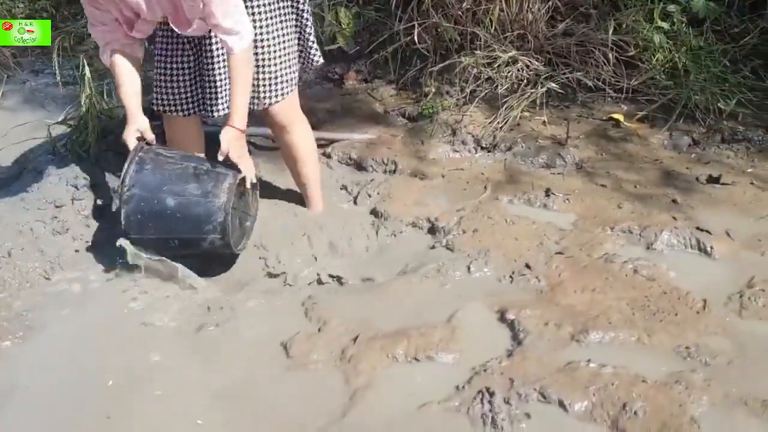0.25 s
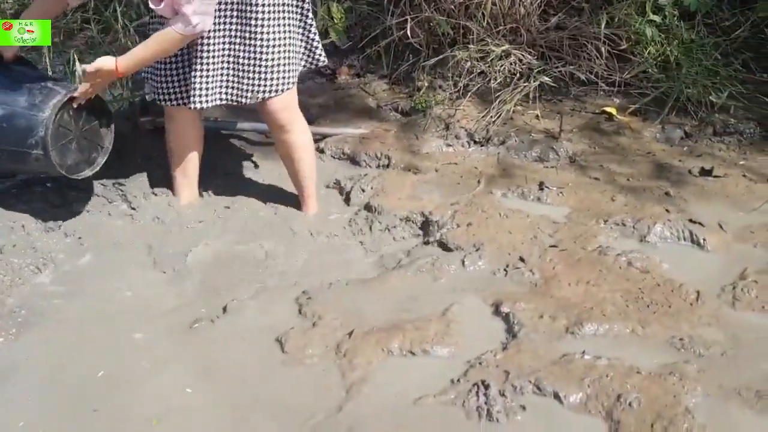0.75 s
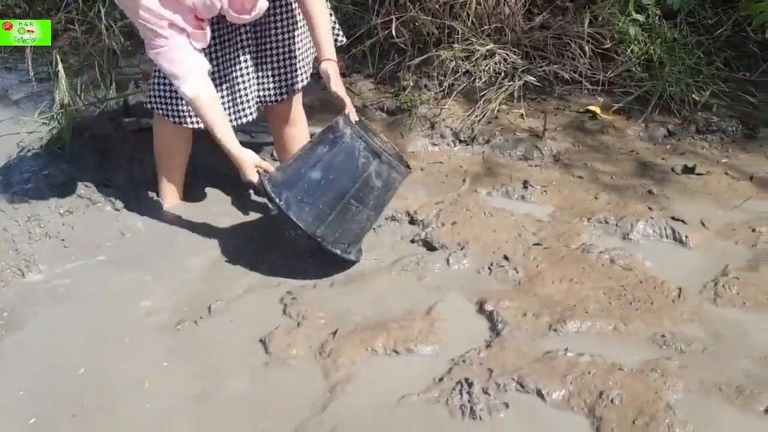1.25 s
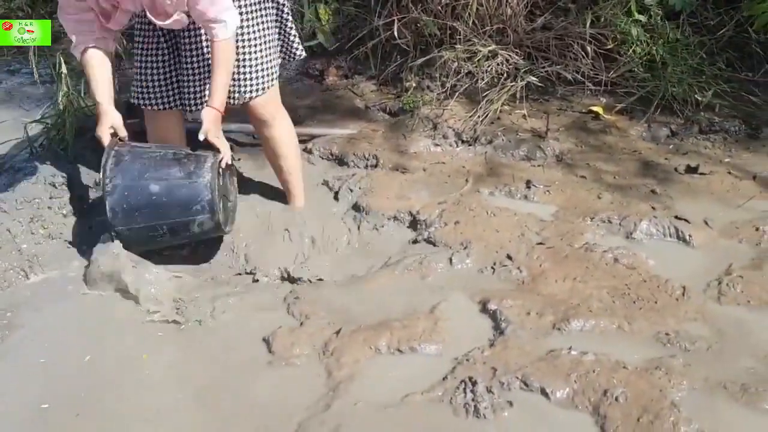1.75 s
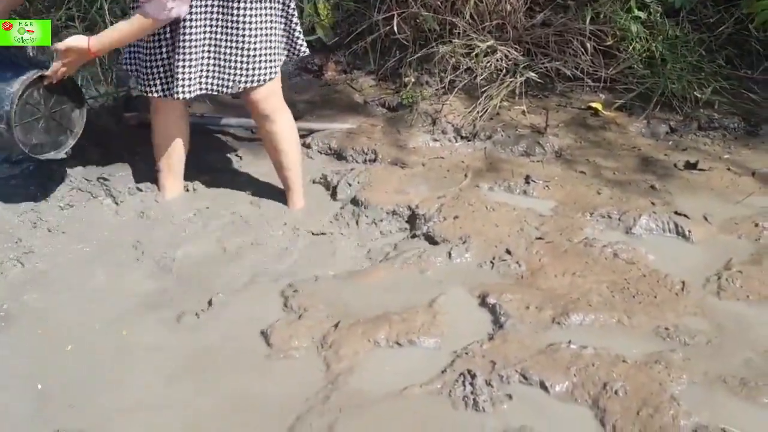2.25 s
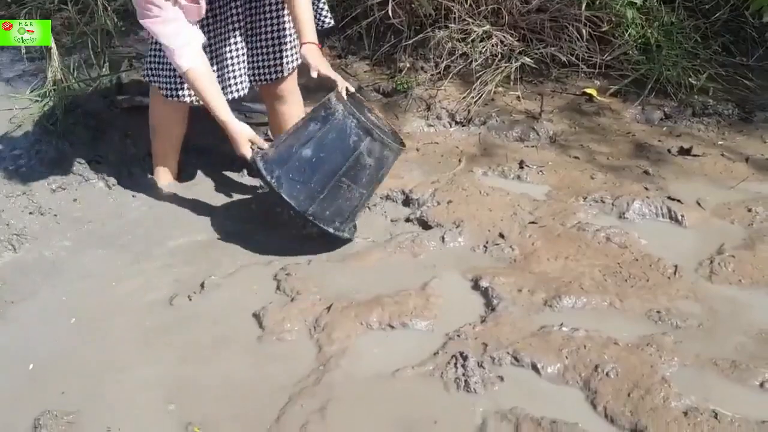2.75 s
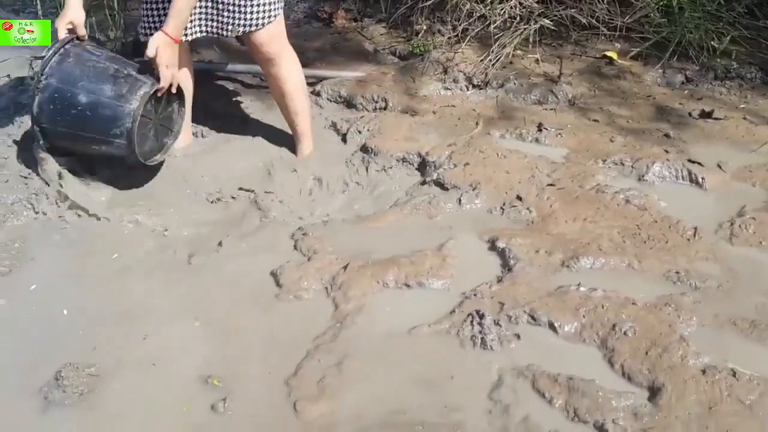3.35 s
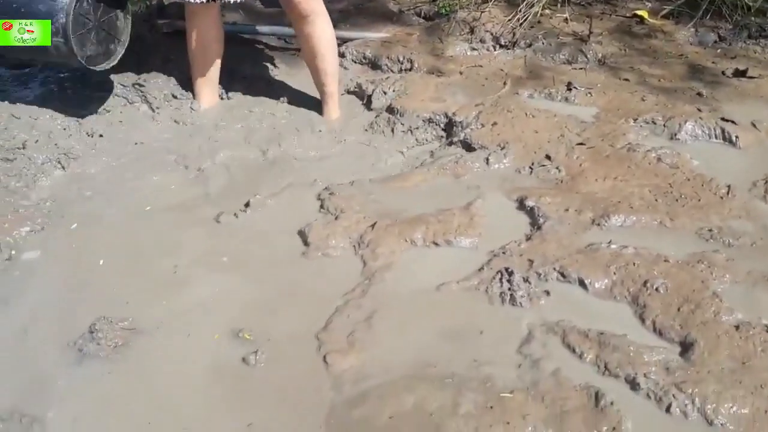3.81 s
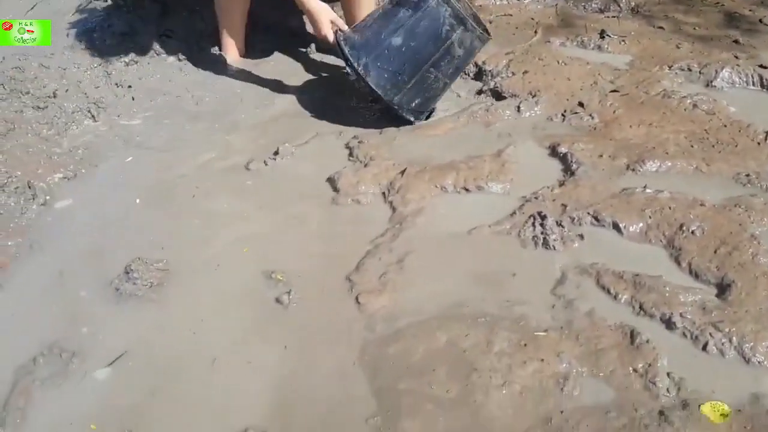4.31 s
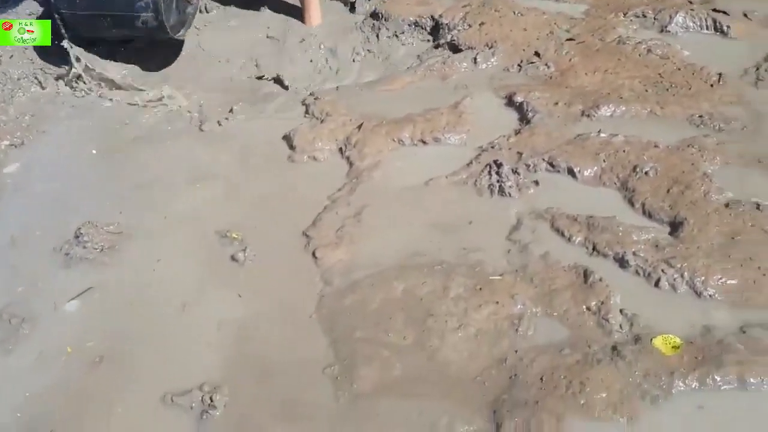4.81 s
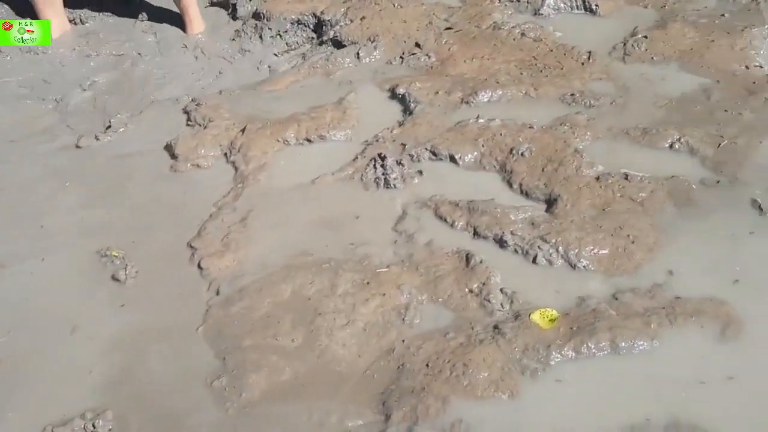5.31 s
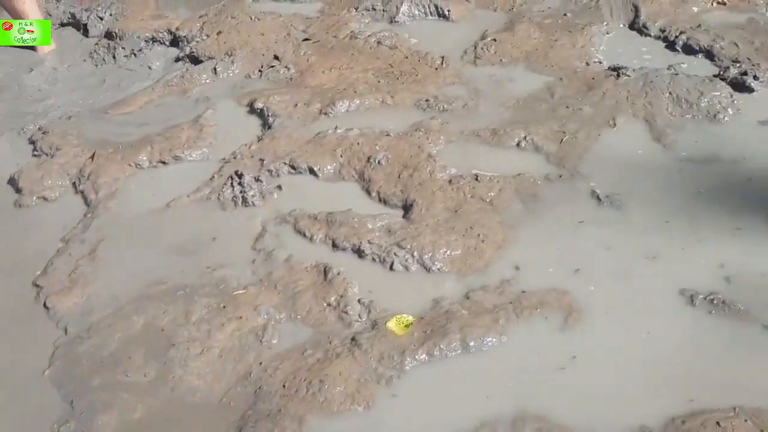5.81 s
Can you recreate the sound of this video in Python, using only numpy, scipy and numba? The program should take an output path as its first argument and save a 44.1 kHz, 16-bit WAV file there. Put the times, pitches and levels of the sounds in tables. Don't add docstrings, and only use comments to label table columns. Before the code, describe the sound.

A plastic bucket scoops thin mud from a shallow pool, four rounds of gulping plop, slosh and hard wet slap, under faint open-air wind.

```python
import sys
import numpy as np
from scipy import signal
from scipy.fft import rfft, irfft
from scipy.io import wavfile
from scipy.ndimage import uniform_filter1d, map_coordinates
from numba import njit

SR = 44100
rng = np.random.default_rng(int(sys.argv[2]) if len(sys.argv) > 2 else 0)


def voltage_ratio(decibels):
    exponent = np.asarray(decibels, float) / 20
    return 10 ** exponent


def store_wav(level_fs):
    pcm = np.round(np.clip(np.atleast_2d(level_fs), -1, 1) * 32767)
    wavfile.write(sys.argv[1], SR, pcm.T.astype(np.int16))


N = 267687

# pitch [Hz], level [dB per octave].
WATER_COLOUR = [(200, -25), (350, -12.5), (600, 0), (850, -5.5), (1300, -4), (1620, -4.5), (1980, -3.5),
                (2500, -6), (3600, 0.5), (4500, -3.5), (5500, -6), (8500, -5.5), (12500, -6), (15800, -10)]


@njit
def grains(start, hz, cycles, glide, size, lead, pan, swell):
    out = np.zeros((2, N))
    for k in range(len(start)):
        tau = cycles[k] / hz[k] * SR / 3
        w = 2 * np.pi * hz[k] / SR
        for c in range(2):
            late = start[k] + c * lead[k]
            i = int(late) + 1
            side = pan[k] if c == 0 else 1 / pan[k]
            z = np.exp((1j * w - 1 / tau) * (i - late)) * size[k] * side
            p = np.exp(1j * w - 1 / tau)
            q = np.exp(1j * w * glide[k] * .7 / (3 * tau))
            rise = np.exp(-swell * (i - late) / tau)
            r = np.exp(-swell / tau)
            for j in range(max(i, 0), min(i + int(5 * tau), N)):
                out[c, j] += z.imag * (1 - rise)
                z, p, rise = z * p, p * q, rise * r
    return out


def lead(s):
    backswings = [
        0.02,
        1.53,
        3,
        4.5,
    ]
    # time into the swing [s], head start of the left port [samples].
    swing_lead = [(.1, 1.9), (.3, 6.56), (.62, 10.6), (.78, 11.3), (.87, 9.8), (1.0, 12), (1.35, 13)]
    turn_s, turn_lead_per_s = 4.84, 4.65
    back = np.array(backswings)
    into = s - back[np.maximum(np.searchsorted(back, s) - 1, 0)]
    return np.interp(into, *np.transpose(swing_lead)) + turn_lead_per_s * np.maximum(s - turn_s, 0)


def ring_pockets(start_s, hz, peak_db, cycles, glide, swell, scatter=0, side=1):
    zero = np.zeros(len(start_s))
    return grains(start_s * SR + zero, hz + zero, cycles + zero, glide + zero, voltage_ratio(peak_db + zero),
                  lead(start_s) + scatter + zero, side + zero, float(swell))


def walk(rate):
    k = int(SR / rate)
    held = np.repeat(rng.standard_normal(N // k + 1), k)
    return 1.04 * uniform_filter1d(held, k)[:N]


def colour(table, hz):
    table_hz, value = np.transpose(table)
    return np.interp(np.log(hz + 1), np.log(table_hz), value)


def noise(table):
    shape = voltage_ratio(colour(table, np.fft.rfftfreq(N, 1 / SR)))
    return irfft(rfft(rng.standard_normal((2, N))) * shape, N)


def highpass(sound, hz):
    return signal.sosfilt(signal.butter(2, hz, "high", fs=SR, output="sos"), sound)


def slosh_db(s, hz):
    layer_hz = [
        550,
        1400,
        3700,
        9500,
    ]
    # level at middle flow [dB], its rise with flow [dB per dB], its rise with depth [dB per dB].
    layer_levels = [
        (-46, 1.24, 1.13),
        (-47, 1, 0.34),
        (-46, 1.0031, -0.11),
        (-48, 0.8, 0.11),
    ]
    # time [s], flow [dB], depth or how much air the water folds in [dB].
    swings = [
        [(.12, -55.5, -2.5), (.28, -60, -3.5), (.46, -51.5, -1.5), (.56, -46.5, -0.8), (.76, -46, 6.5),
         (.84, -40, -3), (.93, -46, 2.5), (1.08, -47.5, -3), (1.2, -62, -1)],
        [(1.45, -60, 3.5), (1.77, -61.5, -4.5), (1.88, -46.5, -4), (1.99, -52.5, -6.5), (2.3, -45.5, 5.5),
         (2.37, -37, 3.5), (2.45, -47.5, 7), (2.62, -50, 1.5), (2.72, -60.5, -3)],
        [(2.87, -63, 1), (3.24, -58.5, -3), (3.49, -52, -2.5), (3.57, -46, 0.5), (3.79, -47.5, 3.8),
         (3.88, -36, -1), (3.96, -47.5, 6), (4.07, -48, 1.5), (4.19, -57, -4.5)],
        [(4.45, -65, 7.5), (4.74, -62, -0.5), (4.98, -56, -1), (5.03, -51, 3), (5.27, -43.5, 2),
         (5.38, -35, -7), (5.44, -44.5, -0.5), (5.57, -48, -1.1), (5.62, -59, -4)],
    ]
    still_db, mid_flow_db = -73.5, -46
    t, flow, depth = np.vstack([*swings, [(N / SR, still_db, 0)]]).T
    flow = np.interp(s, t, flow) - mid_flow_db
    depth = np.interp(s, t, depth)
    layers = np.array([db + a * flow + b * depth for db, a, b in layer_levels])
    place = np.interp(np.log(hz), np.log(layer_hz), np.arange(len(layer_hz)))
    return map_coordinates(layers, [place, np.arange(len(s))], order=1) + colour(WATER_COLOUR, hz)


def cloud(count, size, tail_ms, octaves, lo_hz, hi_hz, db, cycles, glide, scatter_db, lump_db, lump_rate, spread):
    even, normal = rng.random((count, 2)).T, rng.standard_normal((count, 5)).T
    moment, pitch, bulk = np.repeat(rng.random((count // size, 3)), size, axis=0).T
    start = np.minimum(moment * N - tail_ms / 1000 * SR * np.log(even[0]), N - 1)
    hz = np.clip(lo_hz * (hi_hz / lo_hz) ** pitch * 2 ** (octaves * normal[4]), 150, 15800)
    turns = cycles * (hz / 1000) ** 0.78 * np.exp(0.585 * normal[0])
    bigger = np.minimum(-np.log(even[1] * bulk), 2.6)
    lumps = lump_db * walk(lump_rate)[start.astype(int)]
    size_db = slosh_db(start / SR, hz) + scatter_db * bigger + lumps
    peak_db = db + size_db + 10 * np.log10(hz / turns / count * 100)
    scatter = spread * np.clip(hz / 1300, .6, 1) * normal[2]
    return ring_pockets(start / SR, hz, peak_db, turns, glide * (1 + normal[1]), 4.78, scatter, voltage_ratio(normal[3]))


def wash():
    gurgle = cloud(count=5100, size=3, tail_ms=10, octaves=0.1994, lo_hz=249.7, hi_hz=2398, db=7.5,
                   cycles=14.5, glide=0.207, scatter_db=1.3, lump_db=0.9, lump_rate=25, spread=2.34)
    spray = cloud(count=18000, size=12, tail_ms=6, octaves=0.246, lo_hz=1200, hi_hz=8040, db=5,
                  cycles=6.1, glide=0.062, scatter_db=2.5, lump_db=1.5, lump_rate=42, spread=2.74)
    mist = cloud(count=80000, size=5, tail_ms=2.0, octaves=0.5, lo_hz=893, hi_hz=15630, db=10,
                 cycles=4.5, glide=0.043, scatter_db=1.5, lump_db=2.05, lump_rate=13, spread=3.02)
    return highpass(gurgle + spray + mist, 190)


def wind():
    # time of the gust [s], level [dB].
    gusts = [(0, -49.5), (.22, -43.5), (.36, -58.5), (.62, -53), (.98, -66), (1.42, -69.5), (1.6, -54.5),
             (2.36, -58), (2.65, -54), (2.78, -63.5), (3.0, -56.5), (4.09, -58), (4.46, -73), (4.58, -57.5),
             (4.95, -47), (5.34, -57), (5.42, -63.5), (6.07, -74)]
    # pitch [Hz], level [dB per Hz].
    rumble_colour = [(20, -13.5), (50, 1.5), (100, -0.5), (150, -8.5), (210, -18), (500, -37)]
    air = noise(rumble_colour) * voltage_ratio(4.8 * np.array([walk(22), walk(28)]))
    gust_db = np.interp(np.arange(N) / SR, *np.transpose(gusts))
    return air / np.std(air) * voltage_ratio(gust_db + 2.0)


def field():
    # pitch [Hz], level [dB per Hz].
    rustle_colour = [(300, -10), (600, -2), (4000, -7), (16000, -4)]
    air = noise(rustle_colour)
    return air / np.std(air) * voltage_ratio(-63)


def streams(count=160):
    # start [s], length [s], level [dB], pitch [Hz].
    trickles = [(.53, .08, -37, 4000), (0.99, 0.2, -49, 1870), (1.78, .17, -37.5, 4560),
                (2.55, 0.23, -49, 1880), (2.7, .2, -48, 1100), (3.3, 0.11, -38.5, 4470),
                (4.64, 0.12, -44, 3340), (4.78, 0.18, -41, 4360), (5.0, .3, -38.5, 2100),
                (4.54, .07, -41.5, 840), (4.48, .14, -42, 280), (4.69, .06, -50, 1240),
                (1.82, .13, -44, 480), (3.25, .17, -50, 378), (.41, .1, -43, 570), (.42, .08, -43, 1270),
                (1.44, 0.071, -46.5, 900), (2.87, .06, -42, 1280), (3.05, .07, -41, 900),
                (5.62, 0.22, -56, 1850), (4.92, .08, -48, 3000), (.26, .12, -50, 910), (1.1, .08, -44, 910),
                (3.28, .18, -45, 2350), (4.82, .15, -41, 2300), (1.8, .16, -46, 2400),
                (2.98, .06, -45, 800), (3.9, .04, -33, 6200), (4.83, .1, -41, 1350), (.0, .14, -50, 200),
                (2.45, .15, -50, 6000), (4.1, .12, -50, 1250), (.1, .12, -50, 1200)]
    octaves, scatter_db = 0.19, 3.0
    s, length, db, hz = np.transpose(trickles)[:, :, None]
    even, normal = rng.random((len(s), 3 * count)), rng.standard_normal((len(s), count))
    first, second, chance = np.split(even, 3, axis=1)
    start = s + length * (first + second) / 2
    size_db = db - scatter_db * np.log(chance + 0.022) + 10 * np.log10(length * hz / 300) - 6
    hz = hz * 2 ** (octaves * normal)
    scatter = 4 * (first - second)
    return ring_pockets(start.ravel(), hz.ravel(), size_db.ravel(), 8.4, 0.19, 4.5, scatter.ravel())


def spatter(start_s, hz, db, cycles):
    place = rng.standard_normal(len(hz))
    size = np.minimum(rng.exponential(size=len(hz)), 4.5) - 1.15
    peak_db = db + colour(WATER_COLOUR, hz) + 4.2 * np.log2(hz / 3000) + 2 * size
    return ring_pockets(start_s, hz, peak_db, cycles, 0, 7.0, np.clip(4000 / hz, 1, 3) * place)


def ticks(count=40):
    # time [s], peak [dB], pitch [Hz].
    drops = [(0.0517, -35, 4270), (0.1192, -35, 2860), (0.1506, -34, 3060), (0.3208, -35, 4300),
             (0.546, -25.5, 3870), (0.734, -24.5, 4380), (0.803, -21, 3740), (1.29, -36, 6930),
             (1.391, -35, 2600), (1.502, -41, 2280), (1.548, -36, 2570), (2.0068, -31.5, 3770),
             (2.352, -17.5, 3400), (2.823, -35, 8300), (3.0157, -36.5, 3120), (3.03, -33.5, 4070),
             (3.2554, -31, 5550), (3.7414, -26, 3380), (3.8247, -25, 3140), (3.8445, -15.5, 4430),
             (3.8635, -15.5, 3800), (3.8847, -17.5, 3450), (4.1133, -29, 3900), (4.27, -39.5, 3450),
             (4.47, -39, 5600), (4.559, -31.5, 5120), (4.6046, -31, 3130), (5.3317, -15.5, 2730),
             (5.6966, -38, 3460)]
    spray_ms = 2.2
    s, db, hz = np.transpose(drops)
    ring = ring_pockets(s, hz, db - 2.5, 30.0, 0.15, 9.0)
    even = rng.random((len(s), 2 * count))
    start = (s[:, None] - np.log(even[:, :count]) * spray_ms / 1000).ravel()
    spray_hz = 500 * 31 ** even[:, count:].ravel()
    away = np.abs(np.log2(spray_hz / np.repeat(hz, count)))
    return ring + spatter(start, spray_hz, np.repeat(db, count) + 1 - 6.7 * away, 5.8)


def gulps():
    # time [s], peak [dB], pitch [Hz], ringing [cycles], glide [octaves]. The rows at 110 to 150 Hz
    slow_swells = [(.060, -15.5, 610, 5.3, -0.15), (0.071, -14, 325, 6.2, -0.0042),
                   (.093, -24, 280, 4.9, 0.0074), (1.539, -20.5, 980, 13, 0.18),
                   (1.59, -30.5, 302, 6.9, -0.19), (1.635, -43, 260, 14.5, 0.54),
                   (1.675, -43, 560, 24, 0.86), (1.715, -38, 1200, 52, -0.015), (3.019, -20, 970, 18, 0.18),
                   (3.041, -15, 394, 6, -0.46), (3.08, -33, 260, 13, 0.28), (3.165, -31, 630, 11.5, 0.2),
                   (3.297, -28, 520, 20, 0.77), (4.434, -31, 500, 16.7, 0.81),
                   (4.528, -34, 353, 9.7, -0.38), (4.59, -26.5, 256, 6.3, -0.03),
                   (4.623, -37, 463, 14, 0.86), (4.715, -32, 1400, 19, -0.007), (5.95, -48, 568, 38, 0.34),
                   (4.81, -33, 1100, 14, .1), (4.495, -39, 330, 6, -.2), (2.53, -33, 403, 8, 0),
                   (2.80, -42, 600, 7, .2), (2.92, -37, 620, 8, .1), (1.0, -26, 750, 13, .2),
                   (0.63, -28, 510, 7.2, 0), (1.6, -37, 1180, 14, .2), (.47, -36, 1000, 12, .1),
                   (4.86, -38, 510, 5.3, 0), (4.74, -32, 125, 3, 0), (4.935, -26, 135, 2.5, 0),
                   (5.035, -28, 125, 3, 0), (2.635, -33, 110, 3.5, 0), (.19, -33, 150, 2.5, 0),
                   (.6, -32, 130, 2.5, 0), (4.82, -33, 120, 3, 0), (1.83, -36, 110, 4, 0),
                   (.385, -37, 130, 3, 0)]
    s, db, hz, cycles, glide = np.transpose(slow_swells)
    return ring_pockets(s, hz, db + 3.5, cycles, glide, 0.41)


def plops(count=8):
    # time [s], peak [dB], pitch [Hz], ringing [cycles].
    large = [(0.062, -22, 301, 2.7), (0.403, -29.5, 549, 9), (0.961, -30, 418, 7), (0.661, -26.5, 605, 7.3),
             (0.752, -16.5, 640, 11), (0.78, -20.5, 546, 15), (1.196, -39.5, 618, 27),
             (1.398, -38, 580, 4.6), (1.544, -25.5, 344, 7.6), (1.904, -29, 686, 7.5),
             (2.279, -22.5, 567, 12), (2.343, -16.5, 674, 10), (2.149, -35, 490, 9.4),
             (2.954, -32.5, 435, 3), (3.026, -25, 326, 3.4), (3.164, -34, 690, 12), (3.652, -24, 465, 10),
             (3.903, -13.5, 556, 4.9), (4.387, -38.5, 487, 6.4), (4.432, -31.5, 528, 10.5),
             (4.49, -31, 705, 9), (4.524, -25.5, 345, 6.7), (4.622, -31, 512, 10), (4.843, -31.5, 780, 15),
             (4.896, -28, 710, 10), (5.0, -30, 804, 6.3), (5.167, -22.5, 631, 18), (5.225, -18, 754, 11.7),
             (5.261, -20.5, 734, 8.9), (5.465, -30.5, 363.4, 12)]
    s, db, hz, cycles = np.transpose(large)
    ring = ring_pockets(s, hz, db, np.clip(cycles, 1, 40), 0.16, 3.6)
    even = rng.random((len(s), 2 * count))
    start = (s[:, None] + 0.02 * even[:, :count] ** 2).ravel()
    ratio = 0.848 * 5.27 ** even[:, count:].ravel()
    shed_db = np.repeat(db, count) - 10.5 - 1.6 * np.log2(ratio)
    return ring + ring_pockets(start, ratio * np.repeat(hz, count), shed_db, 9.1, 0.083, 19.0)


def drips():
    # time [s], peak [dB], pitch [Hz], ringing [cycles].
    small = [(0.196, -36.5, 930, 12), (0.621, -30, 1200, 10), (0.701, -22, 1160, 15), (0.752, -25, 1890, 9),
             (0.823, -30, 969, 12), (0.857, -24, 1025, 18), (1.503, -31.5, 2110, 12), (1.584, -37, 956, 19),
             (1.709, -40.5, 1190, 14), (1.868, -36, 1360, 21), (1.897, -32, 1340, 20),
             (1.921, -27.5, 1160, 12), (2.352, -23, 1200, 9.2), (2.383, -15.5, 1310, 20),
             (2.9, -30, 1010, 5.4), (3.163, -36, 1310, 22), (3.342, -34.5, 1330, 14),
             (3.369, -36, 1390, 12), (3.405, -33, 1060, 14), (3.422, -26, 1040, 10), (3.836, -26, 1150, 15),
             (3.848, -19, 1200, 18), (3.884, -23, 960, 18), (3.905, -9, 1350, 10), (4.497, -34, 1000, 8.5),
             (4.676, -30.5, 1060, 10.5), (4.899, -20, 1120, 5), (5.337, -16, 1930, 13),
             (5.366, -20, 2170, 12), (.272, -38.5, 940, 12), (.545, -30, 686, 9), (.579, -33, 571, 9),
             (.924, -31, 608, 9.1), (1.855, -34.5, 453, 6.8), (1.993, -37.5, 705, 11),
             (2.223, -30, 630, 11.4), (2.318, -21.5, 524, 10), (2.408, -22, 646, 11), (3.364, -34, 807, 9),
             (3.519, -34, 585, 14), (3.883, -20, 567.4, 7), (4.058, -32, 683, 10), (5.03, -31.5, 708, 10),
             (5.084, -29.5, 603, 10), (5.127, -31, 657, 10), (5.298, -25, 654.5, 12),
             (4.605, -37.5, 1700, 14), (1.549, -33, 620, 6)]
    s, db, hz, cycles = np.transpose(small)
    return ring_pockets(s, hz, db + 1.5, np.clip(cycles, 1, 60), 0.14, 15.0)


def blips():
    # time [s], peak [dB], pitch [Hz].
    bubbles = [(.693, -25, 520), (.846, -23, 746), (2.253, -27, 622), (2.383, -25, 420), (3.387, -33, 700),
               (3.544, -32, 614), (3.997, -30, 700), (5.385, -31, 410), (5.507, -34, 430),
               (1.0184, -30, 1200), (2.0318, -35, 1300), (2.149, -30, 1250), (2.5244, -30, 1330),
               (3.1854, -40, 1400), (3.2345, -39, 1250), (3.6994, -28, 1650), (5.6451, -41, 1660),
               (.1664, -38, 2400), (.5374, -32, 2100), (3.8432, -23, 2500), (4.0754, -34, 2200)]
    s, db, hz = np.transpose(bubbles)
    return ring_pockets(s, hz, db + 3, 11.0, 0.15, 8.0)


def smacks(count=24):
    # time [s], peak [dB], pitch [Hz].
    fat_drops = [(0.1895, -33, 4200), (0.3656, -38, 2570), (0.8344, -22, 2980), (0.8724, -13.5, 4120),
                 (0.8844, -22, 4120), (1.4865, -34, 2160), (1.686, -36, 3540), (1.8056, -38, 3340),
                 (1.8367, -32, 2890), (1.8744, -28, 4550), (2.275, -31, 3370), (2.3685, -16, 3540),
                 (2.3837, -13.5, 4393), (2.411, -24, 4800), (3.244, -32, 6300), (3.3764, -25, 4430),
                 (3.5074, -34, 3150), (3.904, -12, 3880), (3.9177, -13, 4810), (4.0594, -31, 3540),
                 (4.9935, -32, 3820), (5.1282, -32, 3400), (5.1602, -30, 3250), (5.2305, -27, 3560),
                 (5.276, -26, 3010), (5.3514, -18, 3720)]
    crack_ms, octaves = 1.98, 0.91
    s, db, hz = np.transpose(fat_drops)[:, :, None]
    even, normal = rng.random((len(s), count)), rng.standard_normal((len(s), count))
    start = (s - crack_ms / 1000 * np.log(even) * even).ravel()
    specks = np.clip(hz * 2 ** (octaves * normal + 0.27), 900, 15500).ravel()
    crack = ring_pockets(start, specks, np.repeat(db, count) - 15, 5.8, 0, 10.0)
    return crack + ring_pockets(s.ravel(), hz.ravel(), db.ravel() - 2.5, 27.0, 0.13, 9.0)


def slaps(count=1200):
    # start [s], length [s], level [dB], share of the length spent swelling [0 to 1].
    sheets = [(0.82, 0.031, -29, 0.28), (.855, 0.042, -27, 0.41), (2.35, 0.012, -26, 0.049),
              (2.36, .025, -26, .4), (2.383, .012, -25, 0.052), (2.395, .03, -32, .5),
              (3.844, .015, -27, 0.025), (3.862, .012, -28.5, 0.2), (3.883, .014, -27.5, 0.101),
              (3.911, 0.015, -26.5, .2), (3.904, .008, -23, 0.016), (5.328, 0.019, -29.5, .2),
              (1.80, .17, -43.5, 0.65), (3.32, .12, -39, 0.85), (4.82, 0.13, -42, 0.54),
              (.868, .012, -28, .4), (5.336, 0.0055, -25, 0.097), (3.016, .035, -47.5, 0.27),
              (1.5, .1, -56, .1), (2.87, .08, -54, .4), (4.265, 0.036, -53, .5), (.545, .06, -41, .05),
              (1.3, 0.022, -52, 0.11), (1.68, 0.032, -49.5, 0.28), (2.1, .1, -47, 0.5),
              (4.99, 0.036, -44, .2), (5.16, .04, -39.5, .3), (.73, .015, -36, .3),
              (4.355, .008, -44.5, .1), (.336, .008, -46, .1), (1.5, .006, -43, .05)]
    s, length, db, swell = np.transpose(sheets)[:, :, None]
    swell = np.clip(swell, .01, .99)
    even = rng.random((len(s), 2 * count))
    u = even[:, :count]
    thickening = np.sqrt(u * swell)
    thinning = 1 - np.sqrt((1 - u) * (1 - swell)) ** 1.4
    place = np.where(u < swell, thickening, thinning)
    level_db = db + 10 * np.log10(length / 0.025) + 0 * u - 5
    hz = 500 * 31 ** even[:, count:]
    return spatter((s + place * length).ravel(), hz.ravel(), level_db.ravel(), 7.2)


def snaps(count=12):
    # time [s], peak [dB], pitch [Hz].
    films = [(0.3394, -34, 9000), (0.5302, -30, 4150), (1.274, -36, 6150), (1.3518, -41, 3650),
             (1.5018, -29, 9500), (2.4663, -29, 3490), (2.9247, -41, 3080), (3.2345, -38, 5130),
             (3.2779, -35, 11300), (3.3523, -30, 5250), (4.2847, -37, 3320), (4.356, -33, 3500),
             (4.7935, -35, 5080), (4.8589, -36, 5570), (5.0045, -28, 2770), (5.1028, -36, 5740),
             (5.2899, -25, 3010), (5.7094, -37, 6960), (5.7678, -37, 2950), (5.8066, -35, 3800)]
    burst_ms, octaves = 1.5, 0.61
    s, db, hz = np.transpose(films)[:, :, None]
    even, normal = rng.random((len(s), count)), rng.standard_normal((len(s), count))
    start = (s - burst_ms / 1000 * np.log(even)).ravel()
    hz = np.clip(hz * 2 ** (octaves * normal), 1500, 15500).ravel()
    return ring_pockets(start, hz, np.repeat(db, count) - 7, 11, 0, 9.0)


def bend(x):
    # pitch [Hz], extra delay of the right port [samples].
    delays = [(250, 7), (450, 2.5), (750, -.6), (1100, 1.54), (1800, 2.4), (2250, 1.8), (2600, -.8),
              (3200, 0.18)]
    hz = np.fft.rfftfreq(N, 1 / SR)
    turn = np.exp(-2j * np.pi * hz * colour(delays, hz) / SR)
    return np.array([x[0], irfft(rfft(x[1]) * turn, N)])


def scene():
    water = wash() + streams() + ticks() + gulps() + plops() + drips()
    water = water + blips() + smacks() + slaps() + snaps()
    return highpass(bend(water), 150) + wind() + field()


def band_limit(x):
    return signal.sosfilt(signal.butter(12, 15940, fs=SR, output="sos"), x)


def record(dry):
    # pitch [Hz], width [Hz], boost [dB].
    port_rings = [(7800, 1340, 1.5), (12440, 1040, 2.5), (2660, 300, -4), (1380, 480, 2.5), (950, 200, -2)]
    for hz, width, db in port_rings:
        dry = dry + (voltage_ratio(db) - 1) * signal.lfilter(*signal.iirpeak(hz, hz / width, SR), dry)
    top = signal.ellip(10, .2, 70, 15850, fs=SR, output="sos")
    left_db = 1.3
    mix = signal.sosfilt(top, dry) * voltage_ratio(np.array([[left_db], [-left_db]]) / 2)
    return band_limit(mix)


dry = scene()
out = record(dry)
store_wav(out)
```